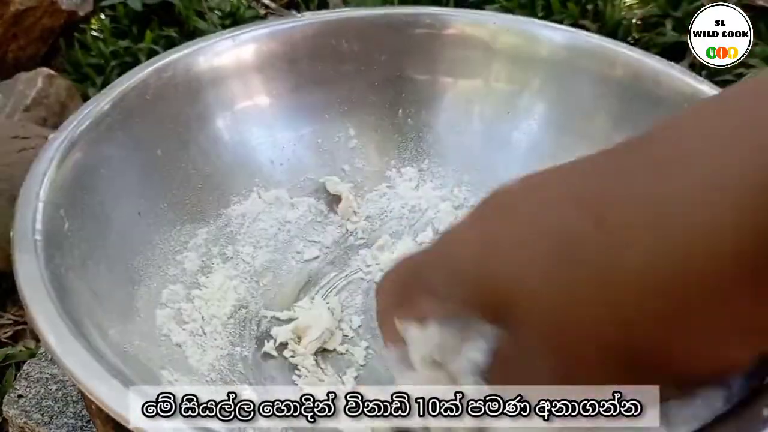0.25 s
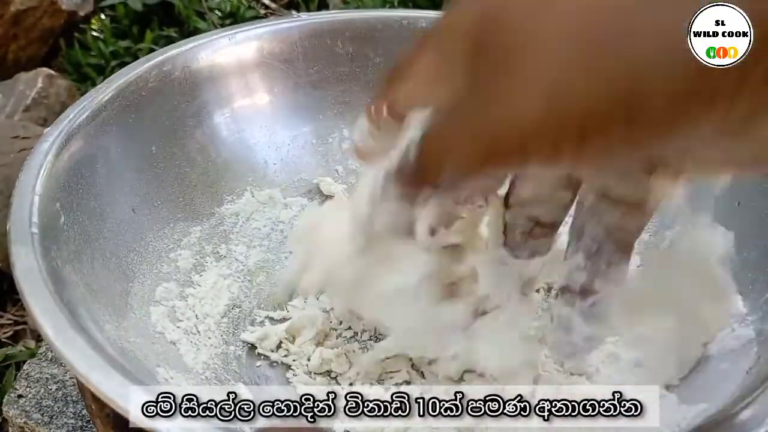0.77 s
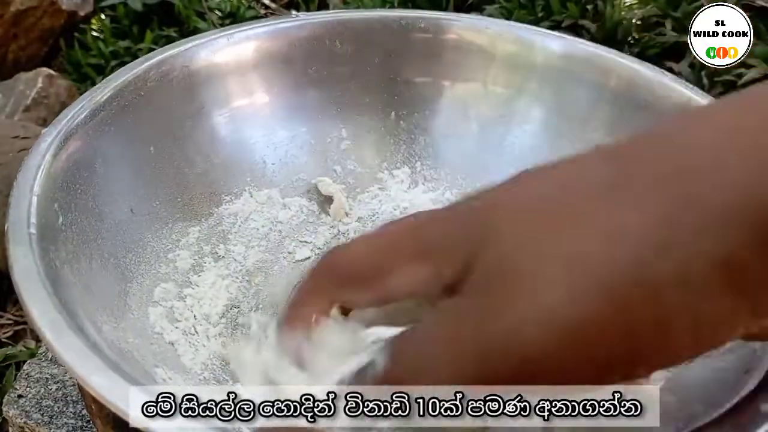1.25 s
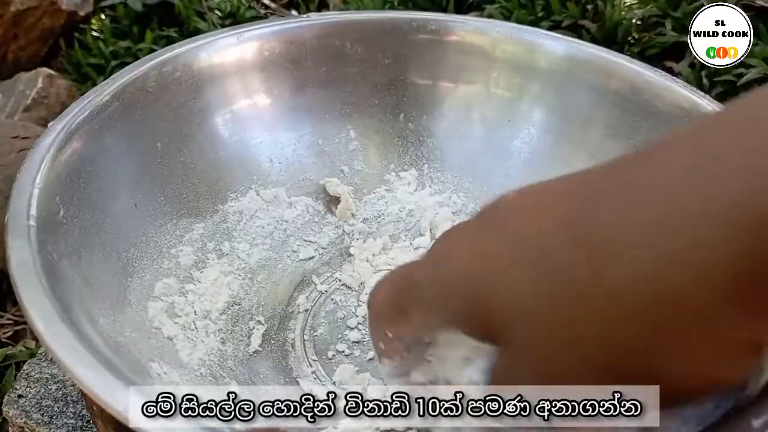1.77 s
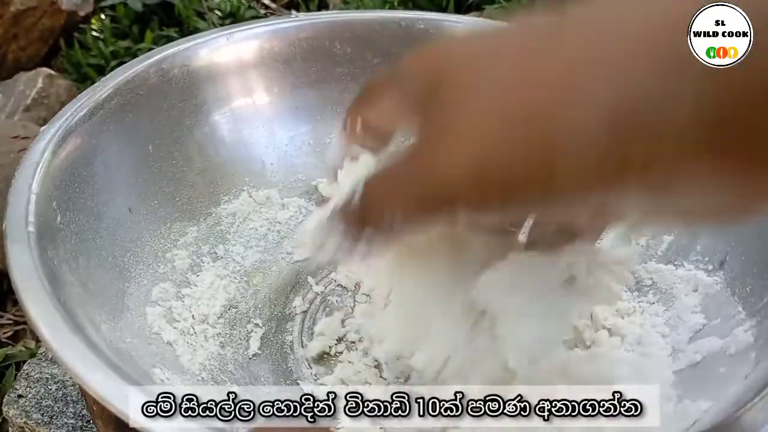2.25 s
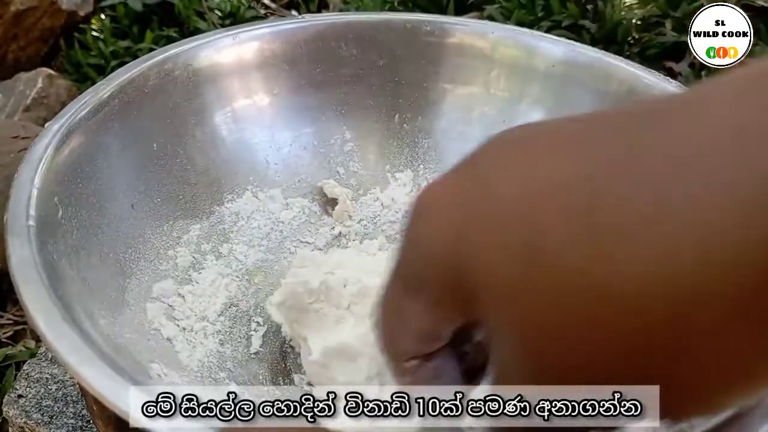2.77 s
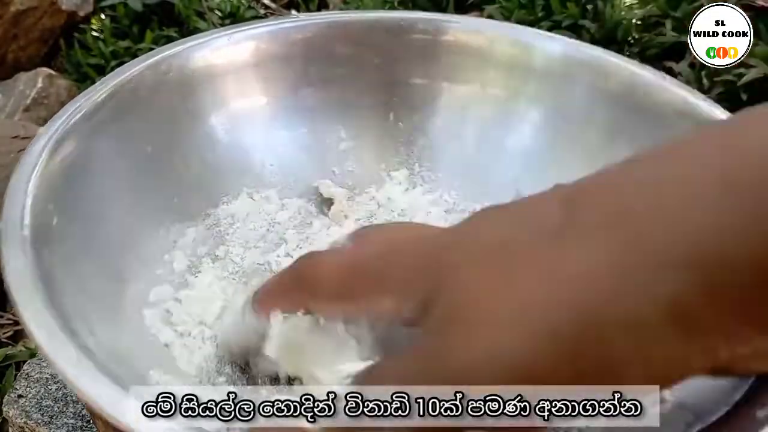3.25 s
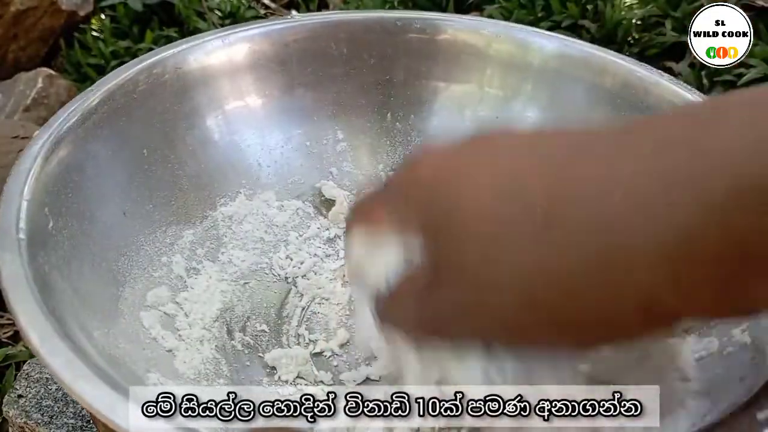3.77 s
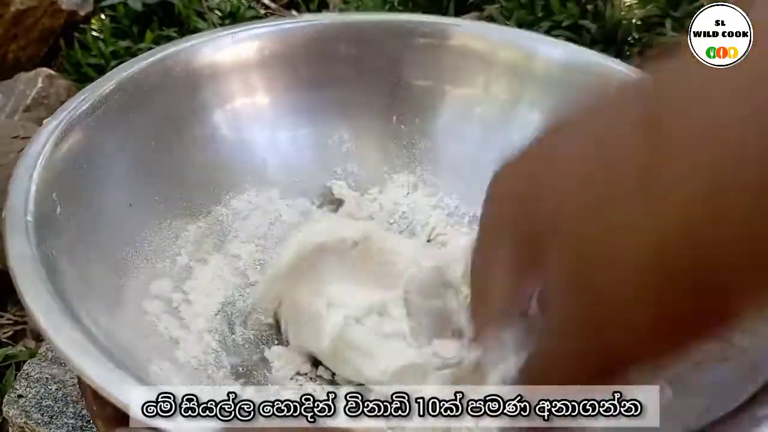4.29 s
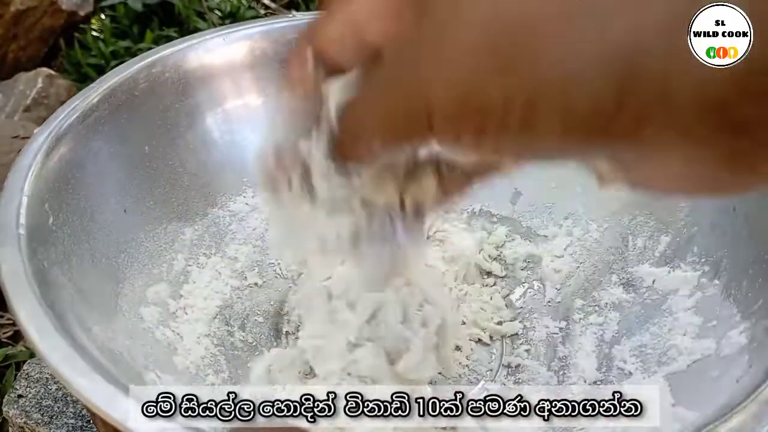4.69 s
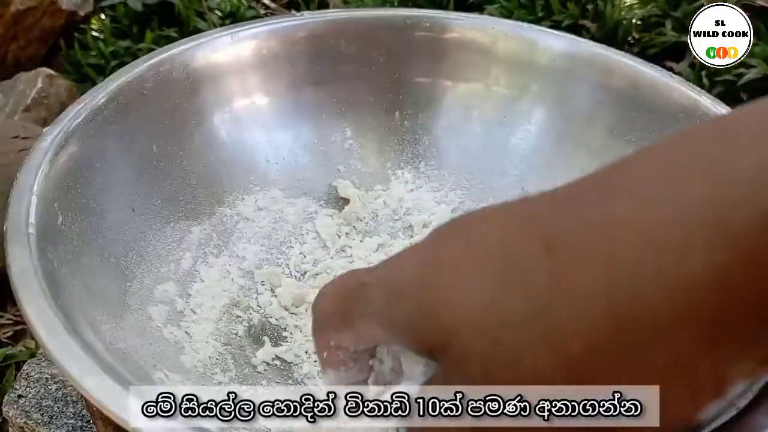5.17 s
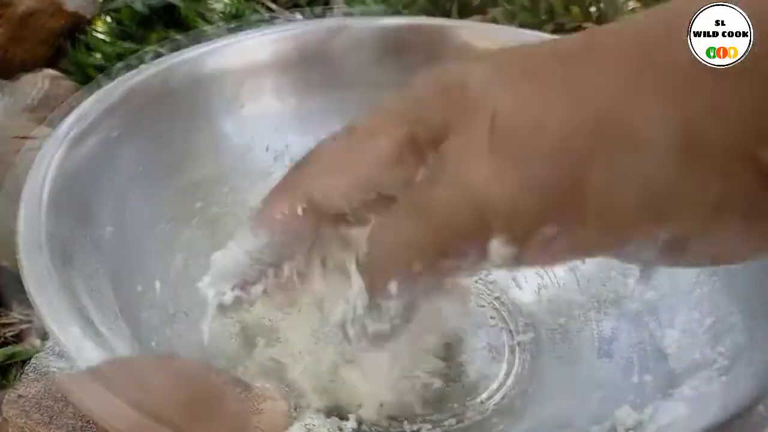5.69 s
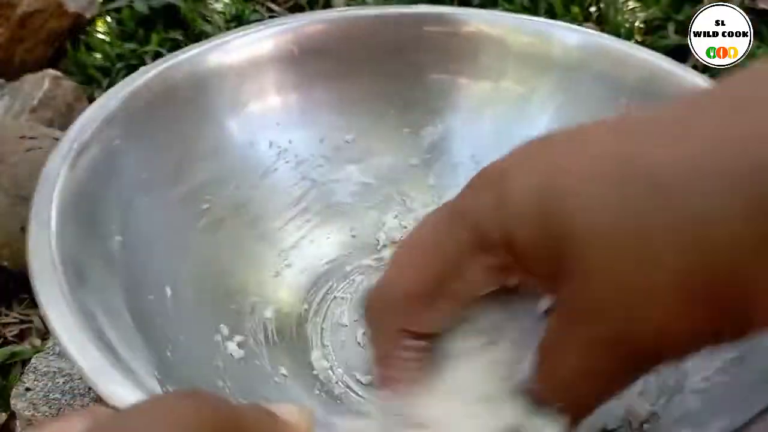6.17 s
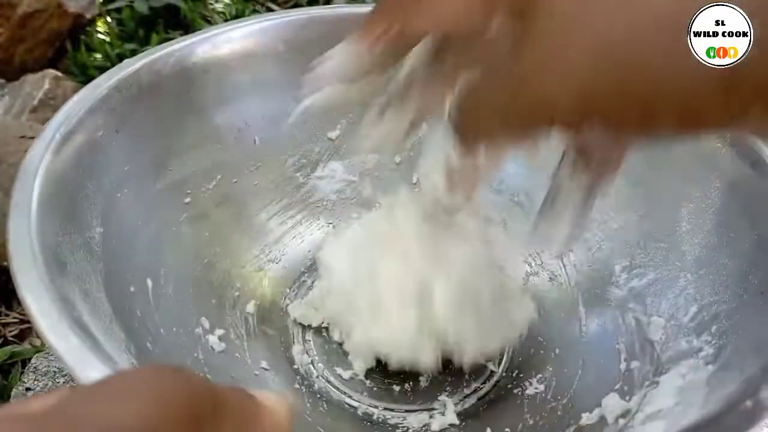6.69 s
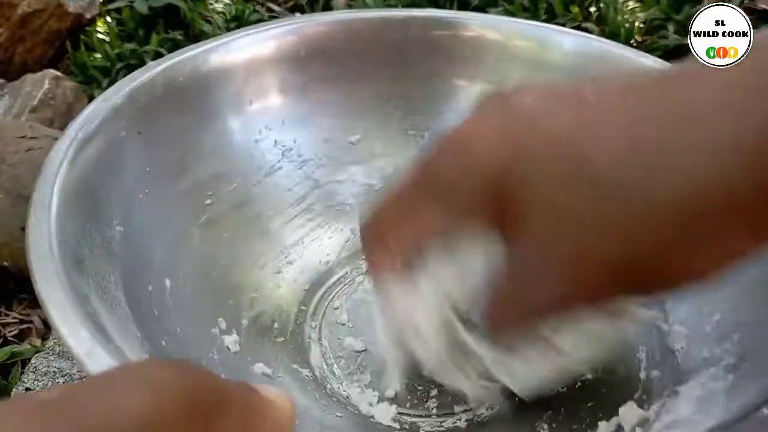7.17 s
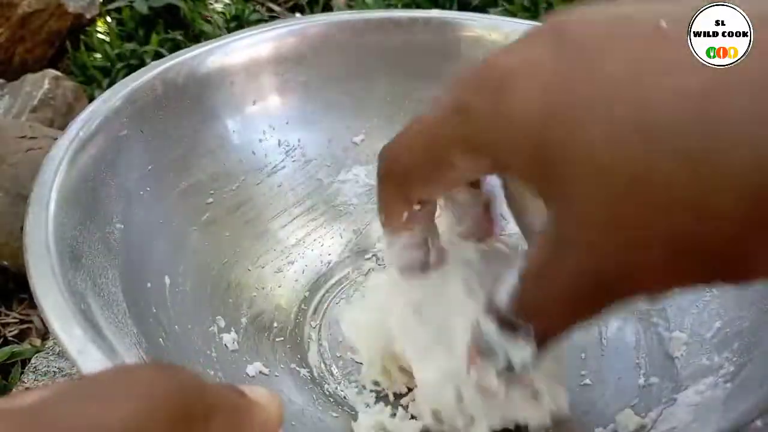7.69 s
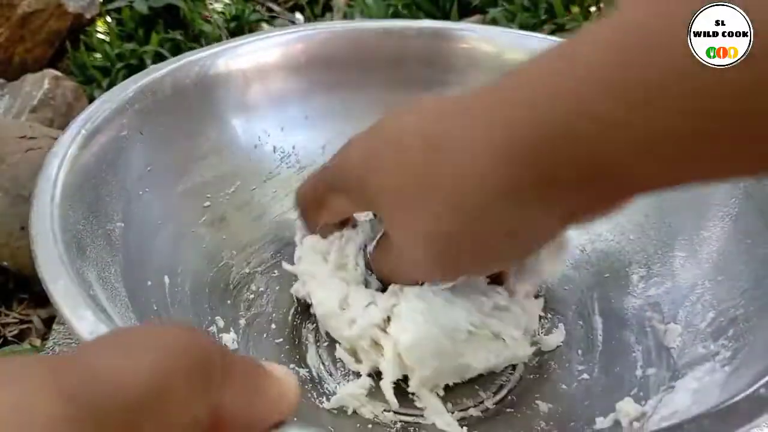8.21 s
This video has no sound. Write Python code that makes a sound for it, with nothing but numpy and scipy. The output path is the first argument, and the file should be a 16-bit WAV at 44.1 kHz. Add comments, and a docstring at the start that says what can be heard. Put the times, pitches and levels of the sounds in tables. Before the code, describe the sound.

Outdoors, close stereo microphones by a steel bowl on stone. Low air rumble, leaf hush and thin, high insect hiss run throughout. From 0.2 to 1.2 s a far bird, perhaps a peafowl, wails in a rising, then falling cry, while small birds slur and chirp nearby. Soft floury rubs come at 0, 0.4, 1.0 and 1.4 s. A dull knock lands at 1.6 s; at 2.7 s a stronger thump brings a snap of grit, with another knock at 3.5 s. A sharp, damped metallic knock hits at 4.3 s, then a fainter, lower wail answers from 4.5 to 5.4 s among peeps and twitter. Soft dough drops fall at 4.6, 4.9 and 5.8 s. From 5.7 to 7.5 s knocks crowd in, with crunchy scrapes strongest around 6.2 to 6.5 s and sticky presses. Birds chirp again at 7.3 s; grating and a firm knock close the scene near 8.2 s.

```python
"""Outdoors, two microphones close to a wide steel bowl on a stone seat, where a hand kneads crumbly dough.
From the start filtered noise makes the air and insect hiss, and a far bird, perhaps a peafowl, wails in
sliding partials; gliding tones chirp as small birds, and noise strokes rub flour and press dough.
From 1.6 s dying modes knock and thump strongly as the bowl bounces; from 2.7 s noise bursts grate as grit.
At 4.5 s a farther bird answers the wail faintly, soft dough drops follow, and knocks and grating crowd in."""
import sys
import numpy as np
from scipy import signal
from scipy.fft import rfft, irfft
from scipy.io import wavfile
from scipy.ndimage import uniform_filter1d, map_coordinates

SR = 44100
rng = np.random.default_rng(int(sys.argv[2]) if len(sys.argv) > 2 else 0)


def unload_audio(sound):
    """Save the sound as a 16-bit wav file, at the path given as the first command line argument."""
    columns = np.transpose(np.atleast_2d(sound))
    # keep every value between -1 and 1, then stretch to whole-number steps
    steps = np.round(np.clip(columns, -1, 1) * 32767)
    wavfile.write(sys.argv[1], SR, steps.astype(np.int16))


N = 372644
TIME = np.arange(N) / SR

# Levels in the tables and settings are relative: each source trims them again where it is mixed.

# spectrum of rumble and leaf hush around the microphones: pitch_hz, density_db
AIR_SPECTRUM = [(40, -24.5), (65, -0.5), (107, -2), (160, -10), (290, -13), (1100, -28), (6800, -29),
                (9500, -30), (11500, -32.5), (15500, -50)]
AIR_DB = -46.5
# insect choruses in the trees: centre_hz, width_hz, level_db
INSECTS = [(8110, 120, -65), (9320, 1830, -55)]

# the far wail as a curve: time_s, pitch_hz, level_db
WAIL = [(.2, 606, -67), (.32, 660, -55), (.39, 789.5, -50), (0.532, 874.3, -46), (0.772, 895, -42),
        (0.802, 886, -74), (0.848, 870.7, -44), (0.972, 858, -48), (1.092, 775, -45), (1.17, 677, -54)]
# the throat that shapes the wail: pitch_hz, gain_db
WAIL_THROAT = [(800, -15), (1520, -0.5), (1780, 1.5), (2300, 0), (2680, -8)]
# a farther bird answers with the same cry: delay_s, pitch_ratio, level_db
ANSWER = (4.33, 0.89, -23.5)

# bouts of far twitter: start_s, end_s, middle_hz, level_db
TWITTER = [(2.054, 2.749, 5620, -77), (3.927, 4.107, 8370, -63), (4.141, 4.963, 5550, -68),
           (7.299, 7.893, 5650, -64)]
TWITTER_SPREAD = 1.2  # pitch ratio, up or down
# a small bird's motif: delay_s, length_s, first_hz, last_hz, level_db
MOTIF = [(0, 0.0128, 4370, 4890, 1), (0.017, 0.0273, 6990, 5930, 2.5), (0.023, 0.0078, 6350, 4970, -3),
         (.05, .012, 2900, 4700, 2.5), (0.063, .016, 5293, 3050, 1.5)]
# its songs, each repeating the motif: start_s, repeat_s, level_db
SONGS = [(.762, 0.13, -56.5), (2.655, 0.14, -54), (4.466, 0.1285, -54.5), (7.252, 0.13, -53)]
SWELL_DB_PER_REPEAT, SONG_PITCH_SPREAD = 3, 0.0182
# slurs of a second bird: start_s, first_hz, last_hz, level_db
SLURS = [(0.216, 4360, 2640, -50.5), (0.327, 3230, 2830, -51), (0.672, 3170, 3840, -51.5),
         (0.857, 3840, 2660, -48.5), (0.98, 2820, 3200, -50.5), (1.04, 2913, 1748, -47.5),
         (1.452, 4590, 2540, -47.5)]
SLUR_S, SLUR_SHAKE = 0.095, 0.052
# thin, nearly level whistles, the two highest being overtones of a slur:
# start_s, length_s, pitch_hz, level_db
WHISTLES = [(0.852, 0.028, 7250, -47), (0.849, 0.04, 10650, -46.5), (1.568, 0.024, 1893, -47.5),
            (2.595, .05, 5900, -61), (2.734, 0.204, 2280, -64), (3.093, 0.26, 2646, -62),
            (3.434, 0.12, 2544, -58), (3.7, 0.38, 2300, -64.5), (6.65, 0.029, 2627, -54)]
WHISTLE_SAG = 0.016  # fraction of the pitch, above it at first and below it at last
# bouts of one repeated, arched peep: start_s, end_s
PEEP_BOUTS = [(4.255, 4.9), (5.055, 5.55)]
PEEP_EVERY_S, PEEP_S, PEEP_TOP_HZ, PEEP_ARCH, PEEP_DB = 0.146, 0.0324, 2364, 0.082, -57
# single rising pips: start_s
PIPS = [.643, 2.264, 2.695, 4.175, 7.815]
PIP_S, PIP_FIRST_HZ, PIP_LAST_HZ, PIP_DB = 0.0187, 3907, 4340, -50

# slips of the bowl over grit on the stone: start_s, level_db, dying_s
GRATES = [(2.725, -31, 0.00055), (3.255, -40, 0.00056), (4.323, -30.5, 0.0013), (5.138, -31.5, 0.0053),
          (5.887, -29.5, 0.0036), (5.909, -32, 0.0064), (6.015, -38.5, 0.00066), (6.224, -19, 0.0015),
          (6.405, -23, 0.0042), (6.4315, -21, 0.012), (6.451, -31, 0.006), (6.503, -36.5, 0.0026),
          (6.618, -24.5, 0.0011), (7.116, -36.5, 0.0022), (7.151, -24.5, 0.0054), (7.967, -31.5, 0.00056),
          (8.01, -31, 0.0019), (8.072, -36.5, 0.00063), (8.087, -29, 0.0046), (8.146, -36.5, 0.00053),
          (8.184, -25.5, 0.0015), (8.233, -21, 0.00074)]
# spectrum of the fizz of crushed grit: pitch_hz, density_db
GRIT_SPECTRUM = [(5000, -14), (7000, -2), (9700, 2.5), (11000, -0.5), (12300, -11), (16000, -18)]
# spectrum of the low rasp, shared by the sticky peeling: pitch_hz, density_db
RASP_SPECTRUM = [(700, 4), (1400, -14), (2100, 4.5), (2700, -5.5), (3300, 3), (6500, -24), (10000, -41)]
# a slip of SNAP_S snaps with a low rasp; longer ones are mostly fizz
SNAP_S, RASP_DB, RASP_DB_PER_DOUBLING = 0.00096, -1.5, -3.6
# the grains break in uneven clumps, with a weak creep before and after the slip
GRATE_CLUMP_DB, CREEP_S, CREEP_DB = 7, 0.012, -24
# every knock also crushes a little grit, the more the harder the contact
KNOCK_GRIT_DB, KNOCK_GRIT_PER_HARDNESS, KNOCK_GRIT_DYING_S = -8, 0.29, 0.005
WALLS_DYING_S = 0.00055

# pushes that knock the bowl on its seat: start_s, ring_db, thump_db, hardness_db_per_octave
KNOCKS = [(0.05, -43, -41, -2), (1.57, -44.5, -32, -1), (2.705, -34, -27, -6), (3.457, -30, -33, -4),
          (4.321, -44, -31.5, 0), (4.335, -23, -24.5, -16), (4.356, -37.5, -34, 2),
          (5.177, -31, -27.5, -2.5), (5.695, -42, -65, 3), (5.75, -37.5, -32, 18), (6.085, -42.5, -34, 2.5),
          (6.184, -38, -34.5, 2), (6.222, -29.5, -40, 1.5), (6.433, -38.5, -34.5, -19),
          (6.626, -29.5, -29.5, 0.5), (6.899, -29, -32.5, 1), (6.982, -37, -36.5, -6),
          (7.006, -34, -34.5, -5), (7.154, -33, -25, -1), (7.492, -35, -61, 6), (8.233, -24, -32, -4.5)]
# soft drops of the dough ball into the bowl: start_s
DROPS = [4.593, 4.944, 5.801, 6.316, 7.654]
DROP_RING_DB, DROP_THUMP_DB = -51.5, -41.5
# modes of the bowl, damped by dough: pitch_hz, level_db, t60_s
BOWL_MODES = [(456, 5.5, 0.022), (633, 7.5, 0.027), (907, 3.5, 0.0094), (1017, -5.5, 0.09),
              (1162, 1.5, 0.036), (1535, -10.5, 0.18), (1625, -8.5, 0.093), (2000, -1.5, 0.017)]
# modes of the loaded bowl bouncing on its seat: pitch_hz, level_db, t60_s
SEAT_MODES = [(114, -10, 0.095), (184.5, -5.5, 0.06), (260, -1.5, 0.038), (331.5, -3, 0.031)]
# spectrum of the clack of a contact: pitch_hz, density_db
CLACK_SPECTRUM = [(400, -16), (720, 46), (1000, -19), (1350, 3), (2100, 0), (4000, -46)]
# a hard contact stays on the steel and chokes it: this much hardness halves the ringing time
CHOKE_HARDNESS = 7.1  # dB per octave
# after each knock the bowl rocks back once, more weakly
REBOUND_S, REBOUND_DB, REBOUND_JITTER = 0.008, -10, 0.324

# strokes of the palm over floury steel: middle_s, half_length_s, flour_rub_db, dough_press_db
STROKES = [(0.02, 0.19, -44, -50.5), (0.39, 0.079, -49, -57), (1.026, 0.04, -44.5, -69),
           (1.439, 0.14, -42, -54), (1.688, 0.084, -47.5, -65), (2.782, 0.084, -41.5, -65),
           (2.929, 0.034, -46.5, -68), (3.423, 0.11, -41, -54.5), (4.432, 0.053, -39.5, -60),
           (5.098, 0.099, -43, -57.5), (6.202, 0.078, -41, -48.5), (6.423, 0.056, -42, -43),
           (7.164, 0.051, -44, -47.5), (8.087, 0.031, -39.5, -42), (8.175, 0.047, -42, -46.5)]
STROKE_SQUARENESS = 3.6  # exponent of the stroke's envelope
# spectrum of flour rubbed on steel: pitch_hz, density_db
FLOUR_SPECTRUM = [(1000, -26.5), (3300, -19.5), (7000, -13), (9800, -5.5), (12500, -17.5), (16000, -32)]
# spectrum of dough giving way: pitch_hz, density_db
DOUGH_SPECTRUM = [(40, -20.5), (130, -0.5), (260, 0.5), (400, -9), (1000, -19), (9000, -25.5)]
# dry crumbs crackle within the rub of the flour
CRUMBS_PER_S, CRUMBS_DB, CRUMBS_SPREAD_DB = 680, -13.5, -8.5
# the sticky ball peels off the steel in tiny wet clicks, the louder the harder it is pressed
PEEL_PER_S, PEEL_DB, PEEL_SPREAD_DB = 150, -7, 4.5

EDGE_HZ = 15900  # upper band limit of the recorder


def gain_of(db):
    """Amplitude factor of a level in dB."""
    return 10 ** (np.asarray(db) / 20)


def evened(x):
    """Scales a signal to unit power."""
    return x / np.sqrt(np.mean(x ** 2) + 1e-20)


def peaked(x):
    """Scales a blow so that its loudest 5 ms have unit power."""
    power = np.atleast_2d(x ** 2).mean(0)
    return x / np.sqrt(uniform_filter1d(power, size=220).max() + 1e-20)


def follow(rows, t=TIME, axis=1):
    """Reads one column of a curve at the times t."""
    points = np.array(rows)
    return np.interp(t, points[:, 0], points[:, axis])


def add(mix, s, sound):
    """Lays a sound into the mix at s seconds."""
    part = mix[..., max(round(s * SR), 0):][..., :sound.shape[-1]]
    part += sound[..., :part.shape[-1]]


def colour(x, points):
    """Causal, minimum-phase filter of unit energy with the given spectrum."""
    f, db = np.transpose(points)
    hz = abs(np.fft.fftfreq(4096, 1 / SR))
    log_gain = np.log(gain_of(np.interp(np.log(hz + 1), np.log(f), db)))
    taps = np.fft.ifft(np.exp(signal.hilbert(log_gain).conj())).real
    return signal.oaconvolve(x, taps[None] / np.linalg.norm(taps), axes=1)[:, :x.shape[1]]


def pair(size, alike):
    """White noise at two microphones that share the fraction alike of its power."""
    common, left, right = rng.standard_normal((3, size))
    return np.sqrt(alike) * common + np.sqrt(1 - alike) * np.array([left, right])


def wander(rate, size=N):
    """Smooth chance of unit spread, changing about rate times a second."""
    knots = rng.standard_normal(8192)
    place = np.arange(size) * rate / SR % len(knots)
    # joining the knots by straight lines loses power, restored by the factor
    return np.interp(place, np.arange(len(knots)), knots) * np.sqrt(3 / 2)


def scatter(x, t60, gap):
    """Echoes alone: sparse taps dying away after a gap in seconds, different on each side."""
    t = np.arange(SR) / SR
    sparse = rng.standard_normal((2, SR)) * (rng.random((2, SR)) < 0.1)
    taps = sparse * gain_of(-60 * t / t60) * (t > gap)
    return signal.oaconvolve(np.atleast_2d(x), evened(taps) / np.sqrt(SR), axes=1)[:, :N]


def ports(x, lag):
    """A sound from one side reaches the second microphone lag seconds later."""
    shift = np.exp(-2j * np.pi * np.fft.rfftfreq(N, 1 / SR) * lag)
    return np.array([x[0], irfft(rfft(x[1]) * shift, N)])


def narrowed(x, width):
    """Draws unrelated sides towards the centre at the same power: width 0 is mono, 1 leaves them apart."""
    mid, side = x[0] + x[1], (x[0] - x[1]) * width
    return np.array([mid + side, mid - side]) / np.sqrt(2 + 2 * width ** 2)


def patchy(x, depth_db, width_hz, hold_s):
    """Lets the colour drift: random patches of spectrum swell and sink."""
    z = signal.stft(x, nperseg=512)[2]
    bands = np.arange(z.shape[1]) * SR / 512 / width_hz
    moments = np.arange(z.shape[2]) * 256 / SR / hold_s
    places = np.meshgrid(bands, moments, indexing="ij")
    field = map_coordinates(rng.standard_normal((128, 512)), places, order=1, mode="wrap")
    return signal.istft(z * evened(gain_of(depth_db * evened(field))), nperseg=512)[1][:, :N]


def crackle(per_s, spread_db):
    """Random clicks of uneven size, at unit power."""
    size = gain_of(spread_db * np.clip(rng.standard_normal(N), -2, 2))
    clicks = (rng.random(N) < per_s / SR) * size
    return evened(clicks * pair(N, alike=0.3))


def outdoors():
    """Wavering low rumble and patchy leaf hush from noise, with narrow noise bands of insect song."""
    lowpass = signal.butter(1, 500, fs=SR, output="sos")
    highpass = signal.butter(1, 500, "high", fs=SR, output="sos")
    rumble = signal.sosfilt(lowpass, pair(N, alike=0.97)) * gain_of(3.2 * wander(7.9))
    hush = signal.sosfilt(highpass, pair(N, alike=0.77))
    hush = patchy(hush, depth_db=1.6, width_hz=1200, hold_s=0.13)
    air = colour(rumble + hush, AIR_SPECTRUM) * gain_of(AIR_DB)
    hz, chorus = np.fft.rfftfreq(N, 1 / SR), 0
    for centre_hz, width_hz, db in INSECTS:
        bell = np.exp(-2 * ((hz - centre_hz) / width_hz) ** 2)
        band = irfft(rfft(pair(N, alike=1.0)) * bell, N)
        chorus = chorus + gain_of(db + wander(31)) * evened(band)
    return air + chorus


def wail():
    """Long arched cries whose partials slide through a fixed throat, fluttering and echoing among the trees."""
    t, dry = np.arange(WAIL[0][0], WAIL[-1][0], 1 / SR), np.zeros(N)
    for delay, pitch, db in [(0, 1, 0), ANSWER]:
        hz = pitch * follow(WAIL, t) * (1 + 0.0046 * wander(120.4, size=len(t)))
        turns = np.cumsum(hz) / SR
        cry = np.zeros(len(t))
        for k in (1, 2, 3):
            partial_db = follow(WAIL_THROAT, k * hz) + 4.3 * wander(35.3, size=len(t))
            cry += gain_of(partial_db) * np.sin(2 * np.pi * k * turns)
        add(dry, t[0] + delay, cry * gain_of(db + follow(WAIL, t, axis=2)))
    echoes = narrowed(scatter(dry, t60=1.0, gap=0.0073), width=0.083)
    return ports(np.array([dry, dry]), lag=0.000045) + gain_of(-0.5) * echoes


def whistle(length, first_hz, last_hz, settle=1, shake=0.015):
    """A gliding note; settle above 1 glides fast, then levels. A wider glide shakes the pitch more."""
    u = np.linspace(0, 1, int(length * SR) + 2)
    glide = (1 - u) ** settle + 0.052 * wander(432.5, size=len(u))
    hz = last_hz + (first_hz - last_hz) * glide
    hz = hz * (1 + shake * wander(300, size=len(u)))
    return np.sin(np.pi * u) * np.sin(2 * np.pi * np.cumsum(hz) / SR)


def peep():
    """A short note that arches in pitch and drops at its end."""
    u = np.linspace(0, 1, int(PEEP_S * SR))
    hz = PEEP_TOP_HZ * (1 - PEEP_ARCH * (2 * u - 0.7) ** 2)
    return np.sin(np.pi * u) * np.sin(2 * np.pi * np.cumsum(hz) / SR)


def songs(count):
    """The notes of each song: one motif sung count times, raised in level each time, with chance variation."""
    rows = []
    for s, every, db in SONGS:
        for k in range(count):
            for delay, length, first_hz, last_hz, note_db in MOTIF:
                level_db = db + note_db + k * SWELL_DB_PER_REPEAT + 2 * rng.standard_normal()
                shift = 1 + SONG_PITCH_SPREAD * rng.standard_normal()
                rows.append((s + k * every + delay, length, first_hz * shift, last_hz * shift, level_db))
    return rows


def notes():
    """The evenly gliding bird notes: start_s, length_s, first_hz, last_hz, level_db."""
    pips = [(s, PIP_S, PIP_FIRST_HZ, PIP_LAST_HZ, PIP_DB) for s in PIPS]
    level = [(s, length, hz * (1 + WHISTLE_SAG), hz * (1 - WHISTLE_SAG), db)
             for s, length, hz, db in WHISTLES]
    return songs(count=3) + pips + level


def chirps():
    """Clear notes, soft peeps and a farther flock of quick chips, smeared by the echoes of the foliage."""
    near, far, soft = np.zeros((3, N))
    for s, length, first_hz, last_hz, db in notes():
        add(near, s, gain_of(db) * whistle(length, first_hz, last_hz))
    for s, first_hz, last_hz, db in SLURS:
        add(near, s, gain_of(db) * whistle(SLUR_S, first_hz, last_hz, settle=2.2, shake=SLUR_SHAKE))
    for start, end in PEEP_BOUTS:
        for s in np.arange(start, end, PEEP_EVERY_S):
            add(soft, s, gain_of(PEEP_DB) * peep())
    for start, end, middle_hz, db in TWITTER:
        for s in np.arange(start, end, 0.006):
            hz = middle_hz * TWITTER_SPREAD ** rng.uniform(-0.924, 1)
            swell = np.sqrt(abs(np.sin(np.pi * (s - start) / (end - start))))
            chip_db = db + 10 + 2 * rng.standard_normal()
            add(far, s, swell * gain_of(chip_db) * whistle(0.00567, hz * 1.1, hz / 1.1))
    echoes = narrowed(scatter(near + far + soft / 2, t60=0.47, gap=0.0056), width=0.24)
    return gain_of(3) * (near + far + soft) + gain_of(6.5) * echoes


def walls(x):
    """Quick reflections between hand and steel give each place of contact its own uneven bands."""
    t = np.arange(SR // 200) / SR
    taps = rng.standard_normal(len(t)) * np.exp(-t / WALLS_DYING_S)
    return signal.lfilter(taps, [1], x)


def slips():
    """Every crush of grit: the slips of the bowl and the small ones under its knocks."""
    under_knocks = [(s, ring_db + KNOCK_GRIT_DB + KNOCK_GRIT_PER_HARDNESS * hardness, KNOCK_GRIT_DYING_S)
                    for s, ring_db, _, hardness in KNOCKS]
    return list(GRATES) + under_knocks


def grates():
    """Each slip creeps, then crushes a quick cluster of grains; the steel walls throw them back."""
    t = np.arange(-SR // 20, SR // 10) / SR
    fizz, rasp = np.zeros((2, 2, N))
    after = np.maximum(t, 0)
    creep = gain_of(CREEP_DB) * np.exp(-abs(t) / CREEP_S)
    for s, db, dying in slips():
        crush = (1 - np.exp(-after / 0.00031)) * np.exp(-after / dying)
        clumps_db = 4 * wander(2176, size=len(t)) + GRATE_CLUMP_DB * wander(400, size=len(t))
        cluster = (crush / crush.max() + creep) * gain_of(clumps_db)
        rasp_db = db + RASP_DB + RASP_DB_PER_DOUBLING * np.log2(dying / SNAP_S)
        add(fizz, s + t[0], gain_of(db) * peaked(walls(cluster * pair(len(t), alike=0.37))))
        add(rasp, s + t[0], gain_of(rasp_db) * peaked(walls(cluster * pair(len(t), alike=0.36))))
    direct = ports(colour(fizz, GRIT_SPECTRUM) + colour(rasp, RASP_SPECTRUM), lag=0.000216)
    return direct + gain_of(-5.5) * scatter(direct, t60=0.033, gap=0.0023)


def ring(modes, t, spread, apart, tilt_db=0):
    """Dying modes, weighted and tuned by chance of contact; each has its own phase at the two microphones."""
    hz, db, t60 = np.transpose(modes)[:, :, None]
    weight, tuning, phase = rng.standard_normal((3, len(modes), 1))
    sign = (-1) ** np.arange(len(modes))[:, None]
    tilt = tilt_db * np.log2(hz / hz[0])
    level = sign * gain_of(db + weight / 2 + tilt - 60 * t / t60)
    angle = 2 * np.pi * hz * (1 + spread * tuning) * t
    sides = np.array([(level * np.sin(angle + side * apart * phase)).sum(0) for side in (1, -1)])
    return sides * (1 - np.exp(-t / 0.00049))  # soft onset


def blows():
    """Every contact of the bowl: the knocks, their rebounds and the drops of dough."""
    delays = REBOUND_S * (1 + REBOUND_JITTER * rng.uniform(-0.923, 1, len(KNOCKS)))
    rebounds = [(s + delay, ring_db + REBOUND_DB, thump_db + REBOUND_DB, hardness)
                for (s, ring_db, thump_db, hardness), delay in zip(KNOCKS, delays)]
    drops = [(s, DROP_RING_DB, DROP_THUMP_DB, 0) for s in DROPS]
    return list(KNOCKS) + rebounds + drops


def knocks():
    """A contact clacks and rings the steel and bounces the bowl; low hardness favours the low steel modes."""
    t = np.arange(SR // 5) / SR
    steel, clack, seat = np.zeros((3, 2, N))
    for s, ring_db, thump_db, hardness in blows():
        choke = 2 ** (max(hardness, 0) / CHOKE_HARDNESS)
        modes = [(hz, db, t60 / choke) for hz, db, t60 in BOWL_MODES]
        tone = peaked(ring(modes, t, spread=0.0242, apart=0.26, tilt_db=hardness))
        add(steel, s, gain_of(ring_db + 2.5) * tone)
        # a crowd of modes that die at once, heard as a noise burst and louder for a hard contact
        burst = peaked(pair(len(t), alike=0.35) * np.exp(-t / 0.0055))
        add(clack, s, gain_of(ring_db - 22.5 + 0.5 * hardness) * burst)
        thump = peaked(ring(SEAT_MODES, t, spread=0.12, apart=0.29))
        add(seat, s - 0.001, gain_of(thump_db + 3.5) * thump)
    struck = ports(steel + colour(clack, CLACK_SPECTRUM), lag=0.00012)
    direct = struck * gain_of([[1], [-1.3]]) + seat * gain_of([[2], [-2.7]])
    return direct + gain_of(-8.5) * scatter(direct, t60=0.046, gap=0.0025)


def kneading():
    """Strokes hiss with flour and crackle with crumbs while dough gives way in dull lumps and sticky clicks."""
    rub, press = np.zeros((2, N))
    for s, half, flour_db, dough_db in STROKES:
        stroke = np.exp(-abs((TIME - s) / half) ** STROKE_SQUARENESS)
        rub += gain_of(flour_db) * stroke
        press += gain_of(dough_db) * stroke
    grains = evened(pair(N, alike=0.72) * gain_of(2.2 * wander(900) + wander(60)))
    crumbs = gain_of(CRUMBS_DB) * crackle(CRUMBS_PER_S, CRUMBS_SPREAD_DB)
    flour = colour(evened(grains + crumbs), FLOUR_SPECTRUM)
    flour = patchy(flour, depth_db=2.8, width_hz=900, hold_s=0.035)
    give = evened(gain_of(3.5 * wander(40)))
    lumps = pair(N, alike=1.0) * give
    peel = colour(crackle(PEEL_PER_S, PEEL_SPREAD_DB) * give, RASP_SPECTRUM)
    peel = gain_of(PEEL_DB) * (peel + scatter(peel, t60=0.005, gap=0.001))
    # a faint dull murmur stays between the strokes
    dough = colour(lumps, DOUGH_SPECTRUM) * (gain_of(-55) + press)
    return flour * rub + peel * press + dough * gain_of([[1.5], [-1.5]])


def scene():
    """Sums the layers, from the open air to the hand in the bowl."""
    return outdoors() + wail() + chirps() + grates() + knocks() + kneading()


def record(dry):
    """The recorder's bass cut and band limit."""
    bass_cut = signal.butter(3, 42, "high", fs=SR, output="sos")
    dry = signal.sosfilt(bass_cut, dry)
    band_limit = signal.firwin(511, EDGE_HZ, window=("kaiser", 9), fs=SR)
    return signal.oaconvolve(dry, band_limit[None], "same")


dry = scene()
out = record(dry)
unload_audio(out)
```